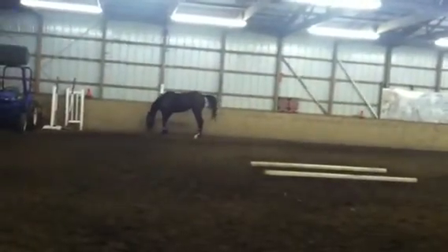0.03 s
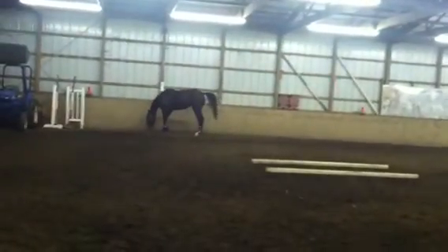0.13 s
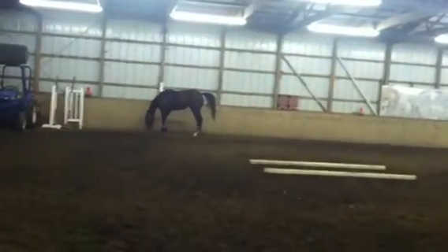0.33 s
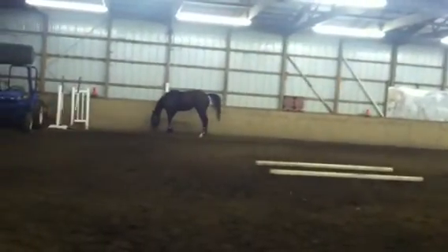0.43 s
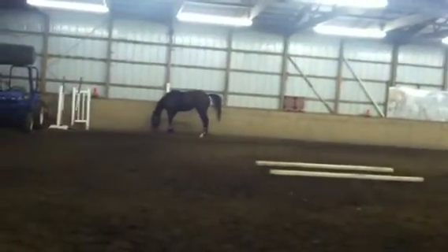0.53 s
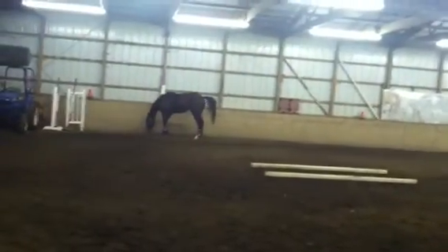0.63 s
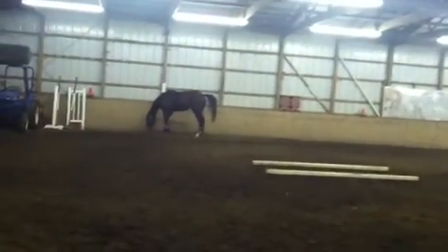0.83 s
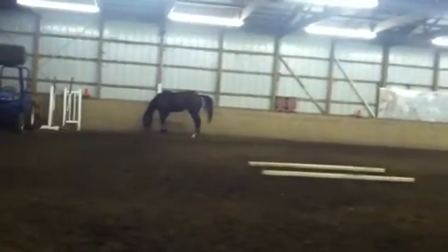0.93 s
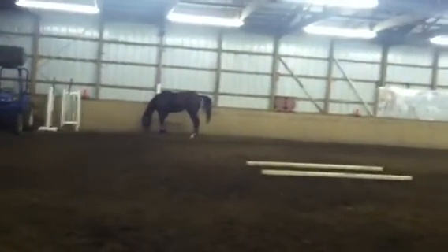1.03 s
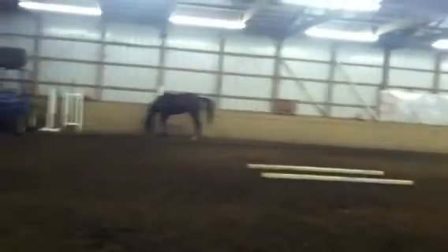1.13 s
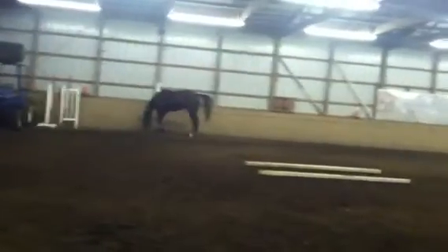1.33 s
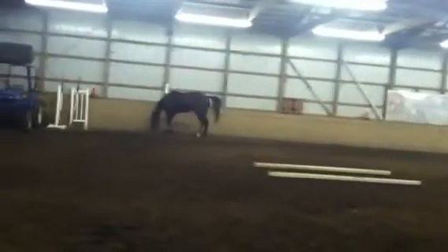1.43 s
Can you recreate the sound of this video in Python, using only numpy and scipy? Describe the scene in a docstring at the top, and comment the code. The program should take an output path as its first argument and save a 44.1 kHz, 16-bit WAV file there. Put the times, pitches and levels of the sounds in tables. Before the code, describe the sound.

A horse gives one short, harsh squeal at about 0.25 seconds, breaking from a rasp into a high whistle and back within a tenth of a second, with a faint indoor arena echo. A hoof scuffs the sand faintly near 0.5 seconds, then lands at 1.1 seconds with a low thump, two lighter knocks and scattering sand. Underneath, a soft low wash fades early into quiet room noise.

```python
"""An indoor riding arena: a low wash dies away over quiet room noise.
A horse gives one short, harsh squeal, its tight vocal folds breaking from a rasp into a high
whistle and back. A hoof scuffs the sandy footing, then lands with a low thump and two lighter knocks.
The hall answers with a faint echo."""
import sys
import numpy as np
from scipy import signal
from scipy.fft import rfft, irfft
from scipy.io import wavfile

SR = 44100
rng = np.random.default_rng(int(sys.argv[2]) if len(sys.argv) > 2 else 0)


def file_out(sig):
    """Save sig as 16-bit WAV at sys.argv[1]."""
    # one column per channel
    cols = np.atleast_2d(sig).T
    # limit, then scale
    lim = np.clip(cols, -1, 1)
    pcm = np.round(lim * 32767).astype(np.int16)
    wavfile.write(sys.argv[1], SR, pcm)


N = 66150
T = np.arange(N) / SR
FREQS = np.fft.rfftfreq(N, 1 / SR)


def amp(db):
    """Decibels to gain."""
    return 10 ** (np.asarray(db) / 20)


def unit(x):
    """Scales to rms 1."""
    return x / np.sqrt(np.mean(x ** 2) + 1e-20)


def curve_at(points, hz, column=1):
    """Reads a column of a table on a log-frequency axis."""
    table = np.transpose(points)
    return np.interp(np.log(hz + 1), np.log(table[0] + 1), table[column])


def colour(x, points):
    """Shapes a signal with an EQ curve, at rms 1."""
    return unit(irfft(rfft(x) * amp(curve_at(points, FREQS)), N))


def wobble(rate_hz):
    """Random motion up to a rate."""
    return unit(irfft(rfft(rng.standard_normal(N)) / np.sqrt(1 + (FREQS / rate_hz) ** 4), N))


def burst(start, rise, decay):
    """Linear attack, then exponential decay."""
    return np.clip((T - start) / rise, 0, 1) * np.exp(-np.maximum(T - start - rise, 0) / decay)


def arch(start, length):
    """Half a sine: swells and stops."""
    return np.sin(np.pi * np.clip((T - start) / length, 0, 1))


def low_cut(x, hz):
    """Thins out the lows."""
    return signal.lfilter(*signal.butter(2, hz, "high", fs=SR), x)


# The room's tone. Each row: frequency in Hz, relative level in dB.
ROOM_EQ = [(25, -37), (60, -23), (130, -2), (230, 0.5), (450, -8.5), (900, -13), (2000, -13), (4000, -19),
           (6500, -22), (9000, -30), (13000, -34.5), (16000, -40.5)]


def room_noise():
    """A quiet, steady bed of noise."""
    return amp(-65.5) * colour(rng.standard_normal(N), ROOM_EQ)


# The wash's dark tone. Each row: frequency in Hz, relative level in dB.
WASH_EQ = [(50, -39.5), (120, -12.5), (200, -6.5), (350, -0.5), (620, -5.5), (900, -18), (1600, -32),
           (4000, -50), (16000, -79)]


def low_wash(start_db=-50, fall_db_per_s=38.5):
    """Low noise that fades from the first moment."""
    return amp(start_db - fall_db_per_s * T) * colour(rng.standard_normal(N), WASH_EQ)


# The voice's contour. Each row: time in seconds, pitch in Hz, level in dB, roughness from 0 to 1,
# scale of the throat resonances.
SQUEAL_CONTOUR = [(0.2303, 1648, -50, 0.88, 1.5), (0.233, 1655, -31.5, 0.65, 0.93),
                  (.251, 1599, -26.5, 0.6, 0.9), (.255, 2215, -24.5, 0.65, 1.2),
                  (.260, 1820, -19.5, 0.19, 0.97), (.267, 1817, -20, 0.24, 1), (.273, 2145, -21, 0.3, 1),
                  (.281, 2121, -19.5, .06, 1), (.293, 2234, -25.5, .15, 1), (.302, 2275, -22.5, .25, 1),
                  (.309, 2076, -22.5, 0.2, 1), (.312, 1699, -23, .4, 1), (0.321, 1538, -26, .65, 1),
                  (0.325, 1641, -28.5, 0.5, 1.3), (0.331, 1902, -31.5, .55, 1.4),
                  (.338, 1777, -45.5, .8, 1.4)]
# The throat's resonances, which weight the harmonics. Each row: frequency in Hz, relative level in dB.
THROAT_EQ = [(1500, -10), (1850, -15), (2200, -10), (3100, -3.5), (3650, 2), (4350, -0.5), (4900, -9),
             (5500, -10.5), (6450, -1), (7300, -14), (8600, -14), (9100, -13), (10800, -18), (12500, -29.5),
             (16000, -31)]
# Turbulent air in the throat. Each row: frequency in Hz, relative level in dB.
RASP_EQ = [(40, -60), (200, -44.5), (600, -30), (1100, -23.5), (1600, -17.5), (2400, -11.5), (3300, -4.5),
           (4500, -5), (6300, 1.5), (7600, -5.5), (10800, -4), (12800, -17.5), (16000, -17.5)]


def squeal(jitter=0.075, shimmer=0.78, flutter_hz=1145):
    """Tight vocal folds whistle cleanly in the middle and vibrate chaotically at both ends."""
    times, hz, db, roughness, throat_scale = np.transpose(SQUEAL_CONTOUR)
    pitch = np.interp(T, times, hz)
    rough = np.interp(T, times, roughness)
    level = amp(np.interp(T, times, db)) * (T > times[0]) * (T < times[-1])
    phase = 2 * np.pi * np.cumsum(pitch * (1 + jitter * rough * wobble(flutter_hz))) / SR
    harmonics = np.arange(1, 9)[:, None]
    gains = amp(curve_at(THROAT_EQ, harmonics * pitch / np.interp(T, times, throat_scale)))
    partials = gains * np.cos(harmonics * phase + rng.uniform(0, 2 * np.pi, harmonics.shape))
    folds = partials.sum(0) / np.sqrt((gains ** 2).sum(0) / 2)
    folds *= (1 + shimmer * rough * wobble(flutter_hz)) / np.sqrt(1 + (shimmer * rough) ** 2)
    rasp = colour(rng.standard_normal(N) * (1 + 0.38 * np.cos(phase)), RASP_EQ)  # pulses with the folds
    rasp_share = 0.95 * rough
    return level * (np.sqrt(1 - rasp_share) * folds + np.sqrt(rasp_share) * rasp)


# The gravel in the voice. Each row: frequency in Hz, relative level in dB.
UNDERTONE_EQ = [(40, -49), (250, -22), (500, -7.5), (1000, 0.5), (1500, -4.5), (2300, -5), (3200, 7.5),
                (4200, -4), (8000, -13.5), (16000, -33.5)]


def undertone(peak_s=0.299, rise_s=0.03, fall_s=0.013):
    """A coarse undertone builds through the squeal and dies with it."""
    age = T - peak_s
    swell = np.exp(np.minimum(age, 0) / rise_s - (np.maximum(age, 0) / fall_s) ** 2 / 2)
    gate = (T > SQUEAL_CONTOUR[0][0]) * (T < SQUEAL_CONTOUR[-1][0])
    return amp(-39) * swell * gate * colour(rng.standard_normal(N), UNDERTONE_EQ)


# The hall's tail. Each row: frequency in Hz, seconds to fall 60 dB, relative level in dB.
HALL_TAIL = [(100, 0.88, -5.5), (230, 0.93, -8.5), (600, 2.6, -14), (2160, 0.66, -9), (4200, .95, -15.5),
             (6504, 0.89, -24), (12000, 0.37, -25.5)]


def arena_echo(x, early_db, tail_db, predelay_s=0.015, early_t60_s=0.19):
    """Adds quick scatter from nearby walls and the long, duller tail of the hall."""
    early = rng.standard_normal(N) * burst(predelay_s, 0.0064, early_t60_s / np.log(1000))
    early /= np.linalg.norm(early)
    hz, t, bands = signal.stft(rng.standard_normal(N), SR, nperseg=256)
    decay = curve_at(HALL_TAIL, hz)[:, None] / np.log(1000)
    gains = np.sqrt(2 / (decay * SR)) * amp(curve_at(HALL_TAIL, hz, column=2))[:, None]
    tail = signal.istft(bands * gains * np.exp(-t / decay), SR, nperseg=256)[1][:N] * (T > predelay_s)
    return x + signal.fftconvolve(x, amp(early_db) * early + amp(tail_db) * tail)[:N]


# The hoof's knocks. Each row: start in seconds, level in dB, centre in Hz, width in octaves,
# decay in seconds.
HOOF_KNOCKS = [(.472, -59.5, 241.4, .4, 0.021), (1.1012, -52, 1604, 1.02, 0.027),
               (1.108, -60, 89.9, 0.66, 0.093), (1.1257, -48, 4400, 0.66, 0.0027),
               (1.128, -41, 1390, 0.82, 0.0083), (1.164, -44, 1373, 0.55, .0045)]
HOOF_ATTACK_S = 0.00063


def hoof_knocks():
    """Each knock is a damped burst: high clicks die at once, the low rumble lingers."""
    out = np.zeros(N)
    for start, db, centre, octaves, decay in HOOF_KNOCKS:
        band = np.exp(-0.5 * (np.log2((FREQS + 1) / centre) / octaves) ** 2)
        noise = irfft(rfft(rng.standard_normal(N)) * band, N)
        envelope = burst(start, HOOF_ATTACK_S, decay)
        out += amp(db) * np.sqrt(np.mean(envelope ** 2)) * unit(envelope * noise)
    return out


# The tone of shifting sand. Each row: frequency in Hz, relative level in dB.
SAND_EQ = [(40, -18), (90, -7), (140, 9), (280, 4), (420, 1.5), (800, -3.5), (1300, -9.5), (2100, -12.5),
           (3500, -26.5), (8000, -34.5), (16000, -63)]
# Scuffs in the footing. Each row: start in seconds, level in dB before the low cut,
# attack and decay in seconds, low cut in Hz.
SAND_SCUFFS = [(.51, -59, 0.041, 0.048, 900), (0.993, -56, 0.008, 0.25, 587),
               (1.128, -44, 0.033, 0.049, 99)]


def sand_scuffs(grain_db=3):
    """The hoof drags through grainy sand, then throws it on landing."""
    grains = colour(rng.standard_normal(N) * amp(grain_db * wobble(rate_hz=395)), SAND_EQ)
    return sum(amp(db) * burst(start, rise, decay) * low_cut(grains, low_hz)
               for start, db, rise, decay, low_hz in SAND_SCUFFS)


# The hollow ring of the blow. Each row: frequency in Hz, level in dB, seconds to fall 60 dB.
THUMP_MODES = [(330, -41.5, 0.061), (456, -44.5, 0.062), (642, -44.5, 0.056), (955, -44.5, 0.065),
               (1448, -42, 0.074), (1750, -45, 0.06)]


def hoof_thump(crack_s=1.1018, crack_hz=2640, glide_s=0.00286, boom_s=1.1035, boom_hz=212.7):
    """The hoof lands: a crack of falling pitch, a few low cycles, and a brief hollow ring."""
    age = np.maximum(T - crack_s, 0)
    crack_cycles = crack_hz * glide_s * (1 - np.exp(-age / glide_s))
    crack = arch(crack_s, length=0.0033) * np.sin(2 * np.pi * crack_cycles)
    boom = arch(boom_s, length=0.015) * np.sin(2 * np.pi * boom_hz * (T - boom_s))
    ring = sum(amp(db) * burst(boom_s, HOOF_ATTACK_S, t60 / np.log(1000)) * np.sin(2 * np.pi * hz * age)
               for hz, db, t60 in THUMP_MODES)
    return amp(-33.5) * crack + amp(-26.5) * boom + ring


def scene():
    """A fairly dry voice and a wetter hoof over the room's bed, in mono."""
    call = low_cut(squeal() + undertone(), hz=130)
    voice = arena_echo(call, early_db=-26, tail_db=-12)
    hoof = arena_echo(hoof_thump() + hoof_knocks() + sand_scuffs(), early_db=-12, tail_db=-2)
    return (voice + hoof + room_noise() + low_wash())[None]


def record(dry, cutoff_hz=16100):
    """A steep high cut trims the very top."""
    high_cut = signal.firwin(511, cutoff_hz, window=("kaiser", 9), fs=SR)
    return signal.oaconvolve(dry, high_cut[None], "same")


dry = scene()
out = record(dry)
file_out(out)
```